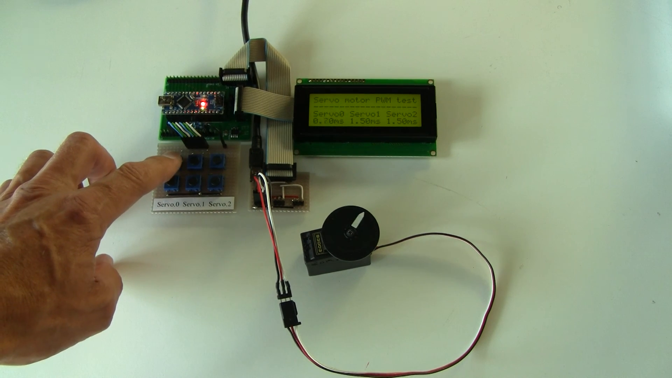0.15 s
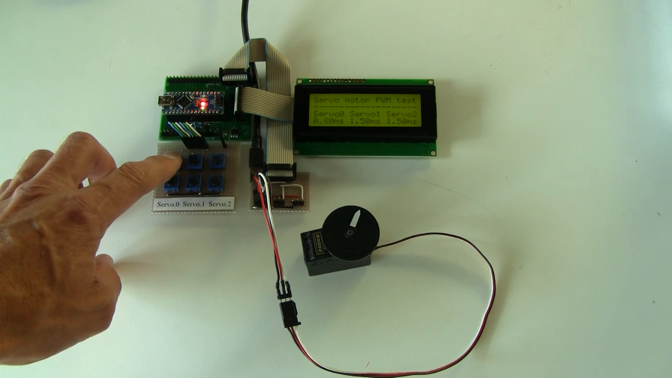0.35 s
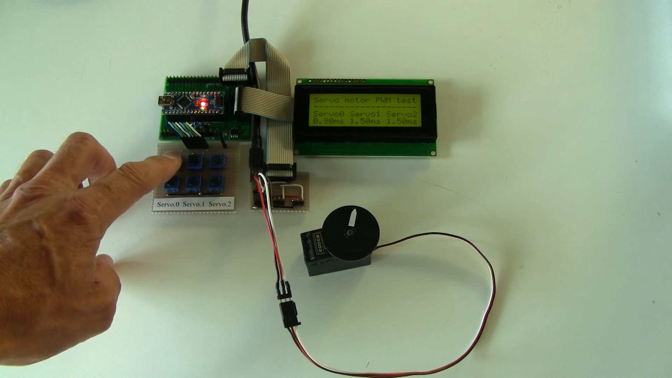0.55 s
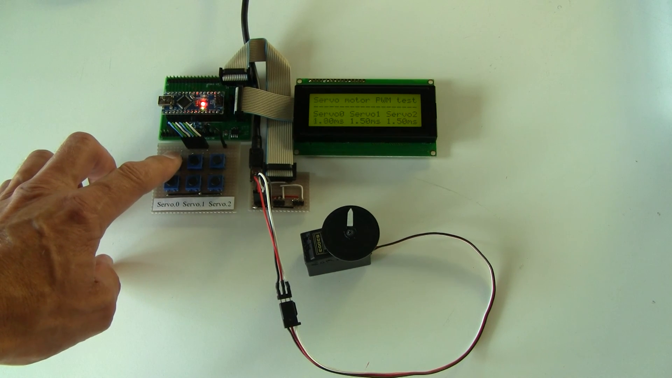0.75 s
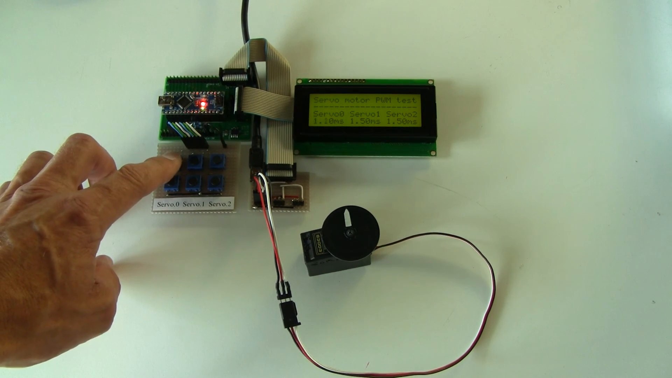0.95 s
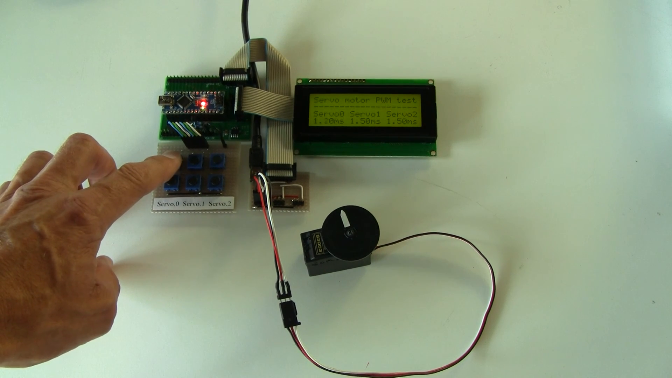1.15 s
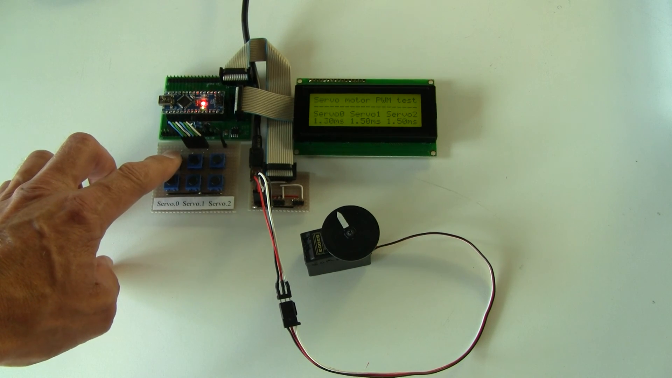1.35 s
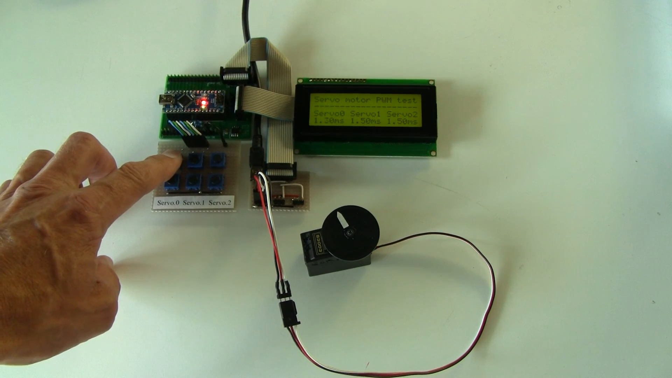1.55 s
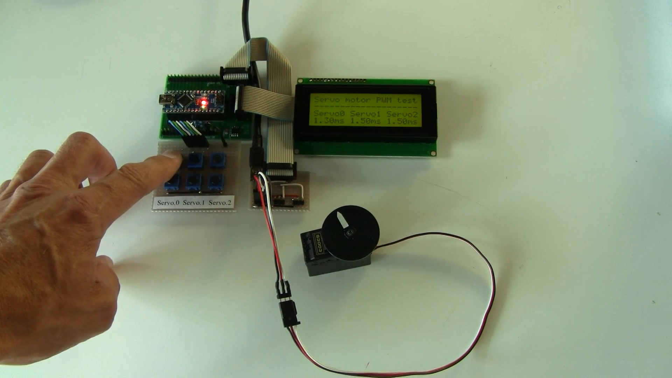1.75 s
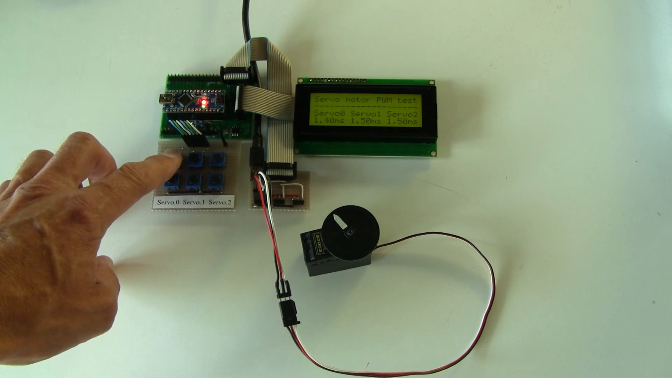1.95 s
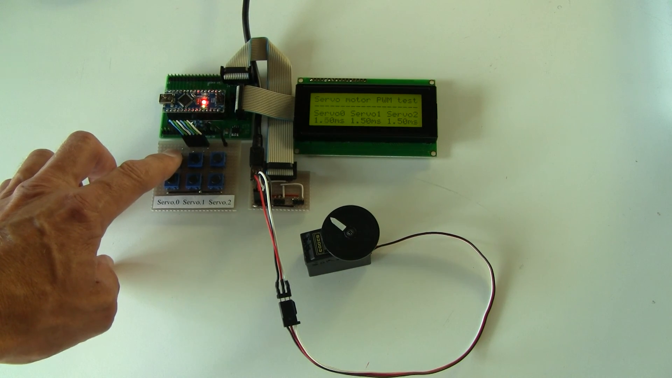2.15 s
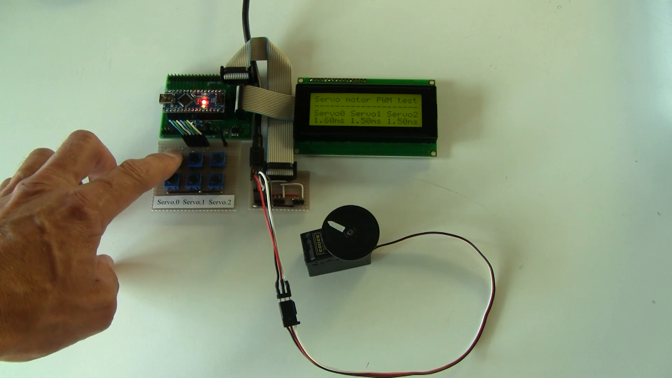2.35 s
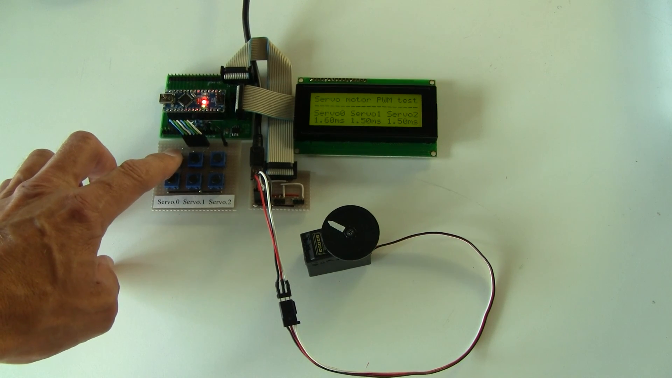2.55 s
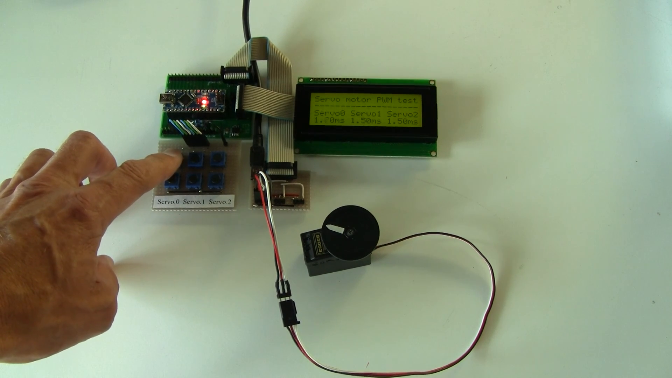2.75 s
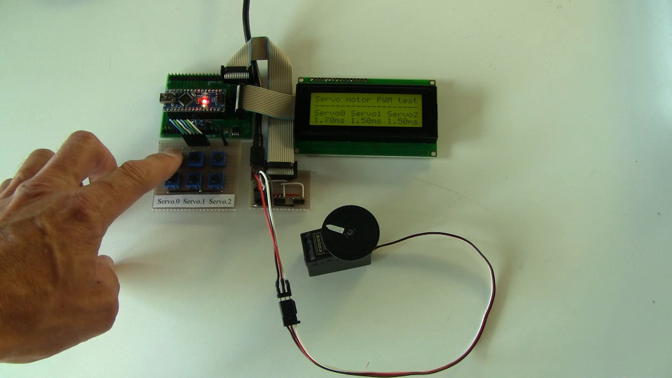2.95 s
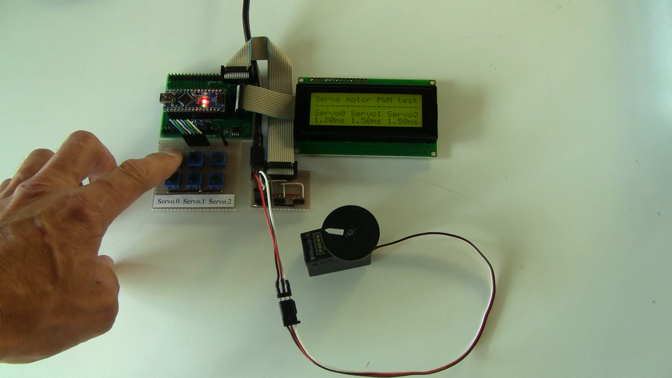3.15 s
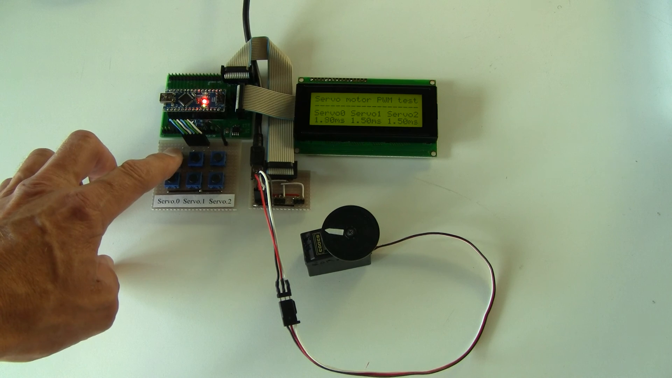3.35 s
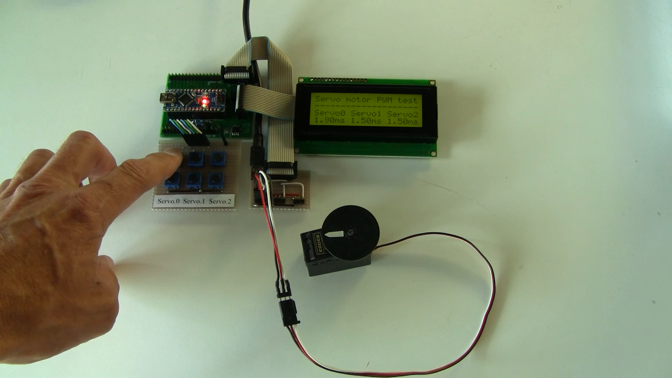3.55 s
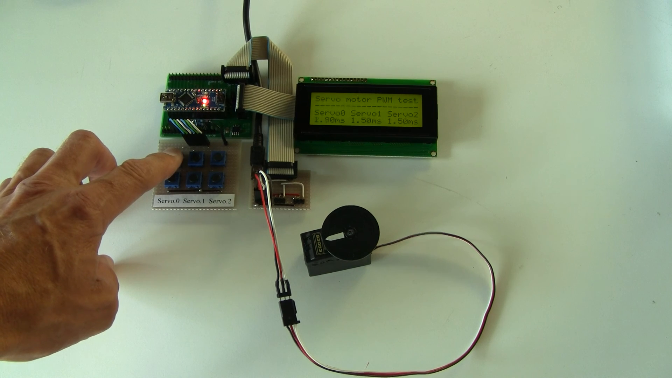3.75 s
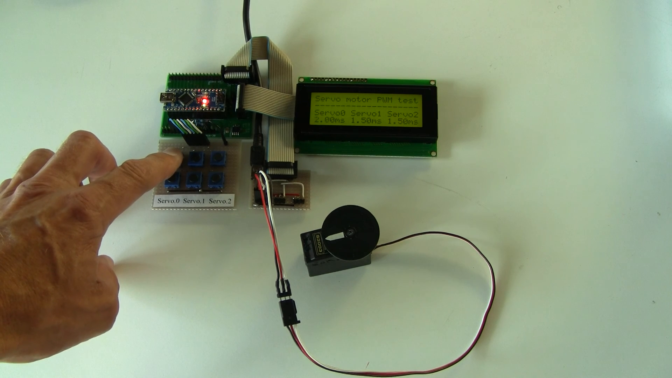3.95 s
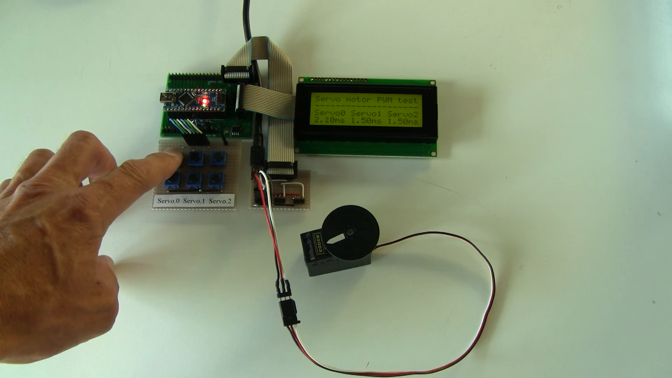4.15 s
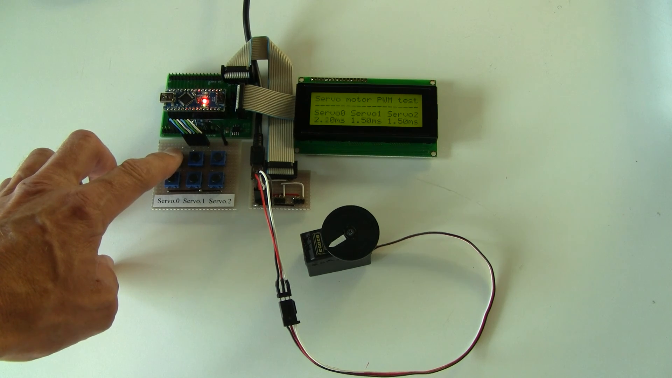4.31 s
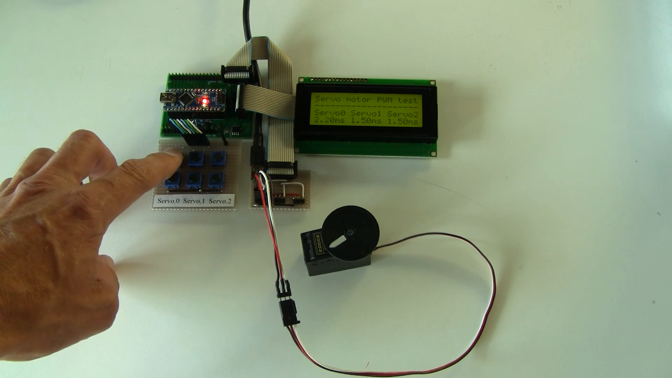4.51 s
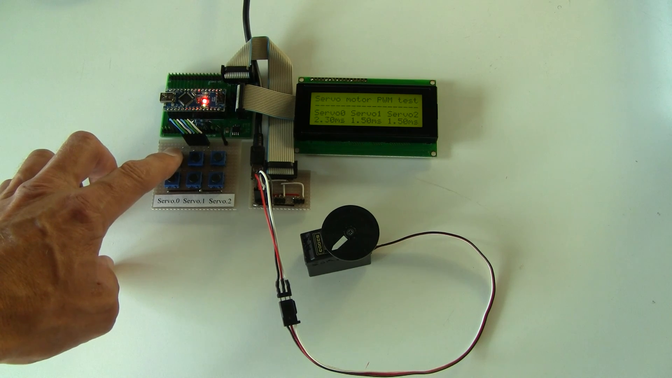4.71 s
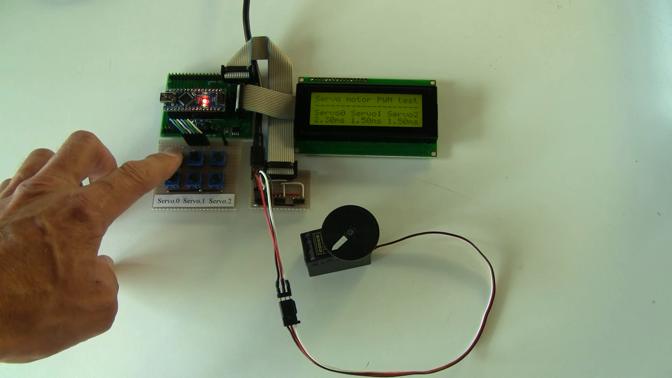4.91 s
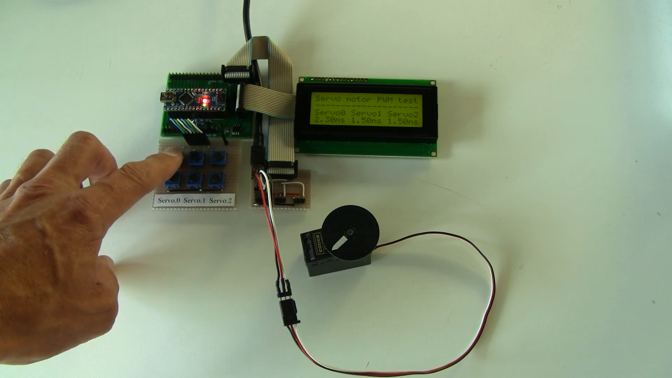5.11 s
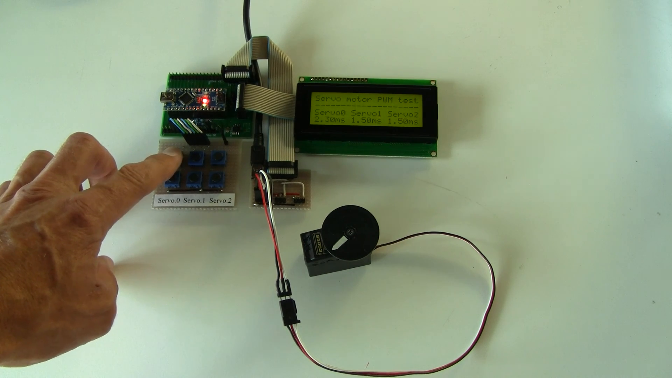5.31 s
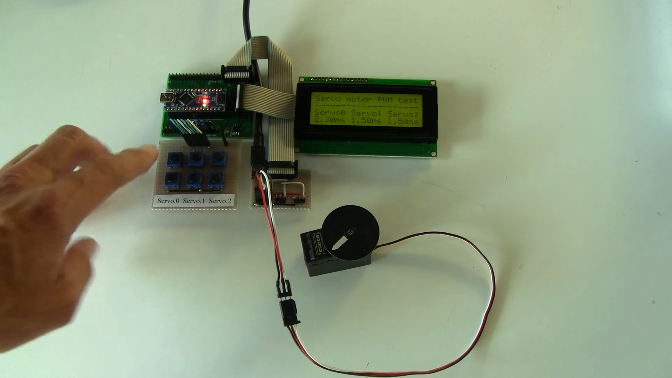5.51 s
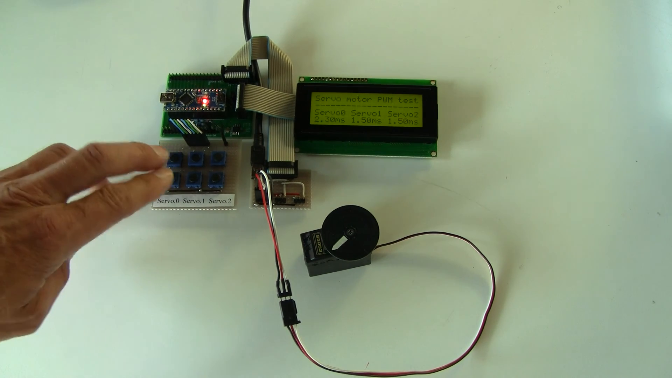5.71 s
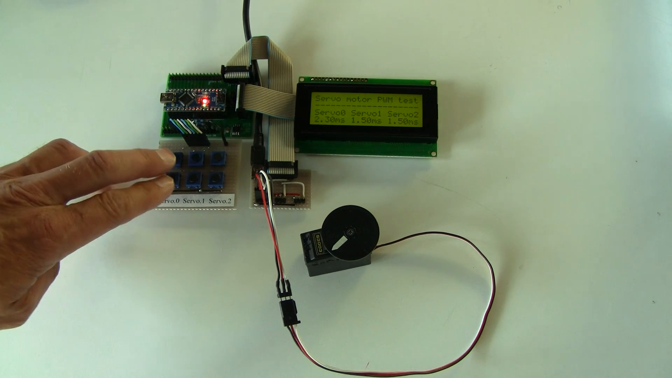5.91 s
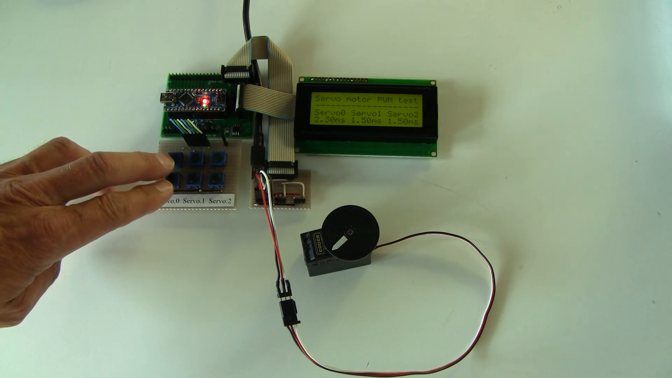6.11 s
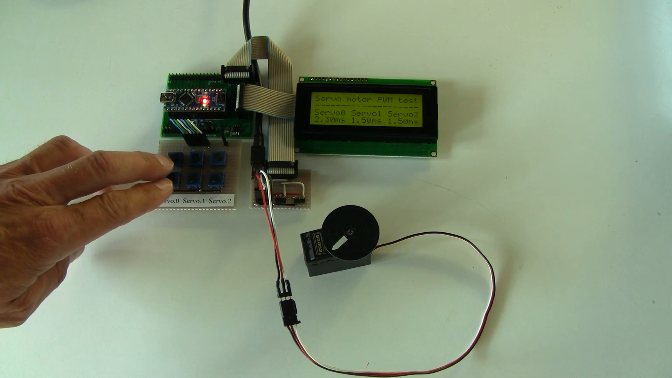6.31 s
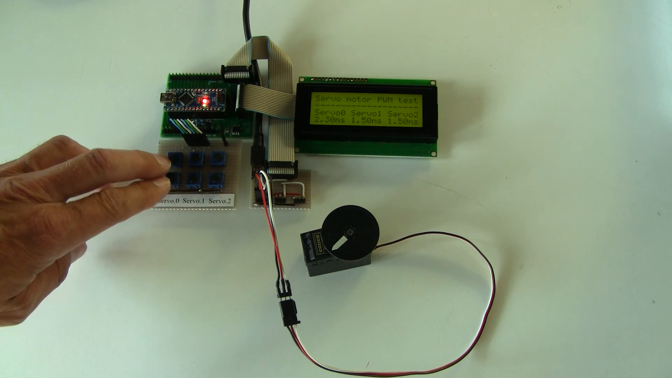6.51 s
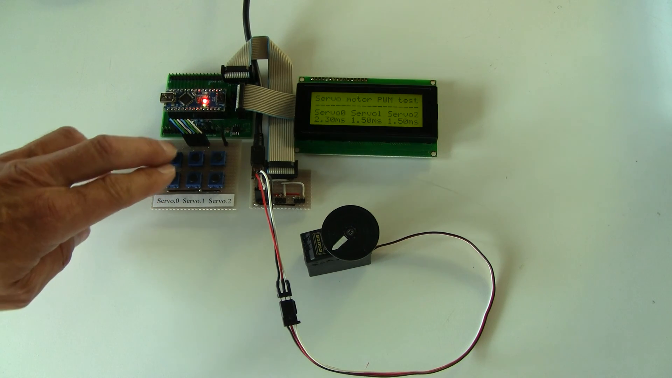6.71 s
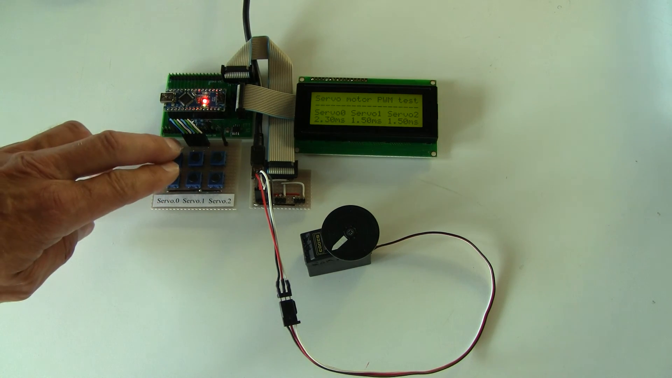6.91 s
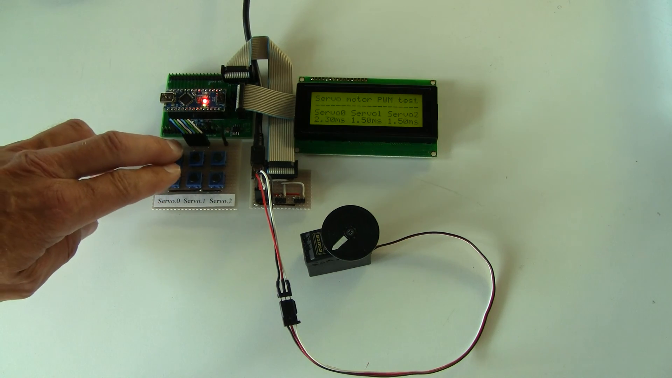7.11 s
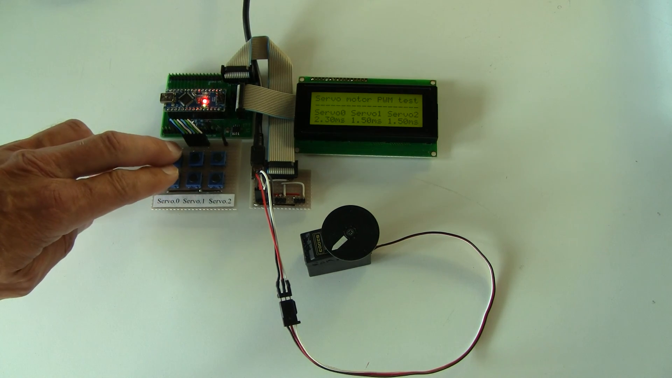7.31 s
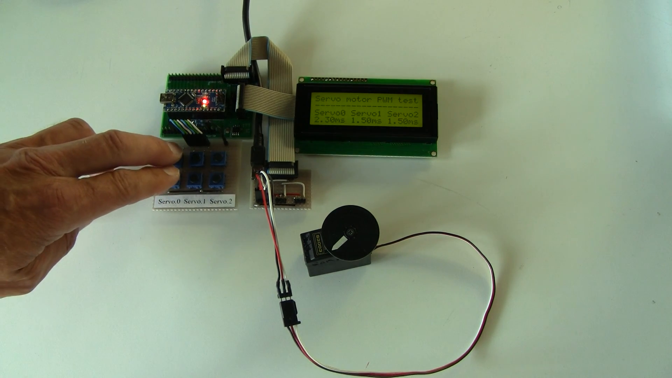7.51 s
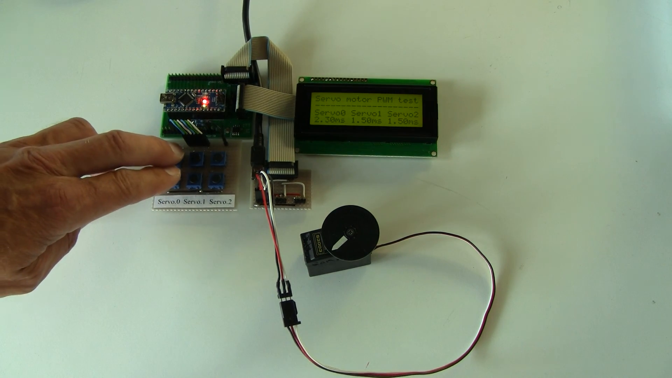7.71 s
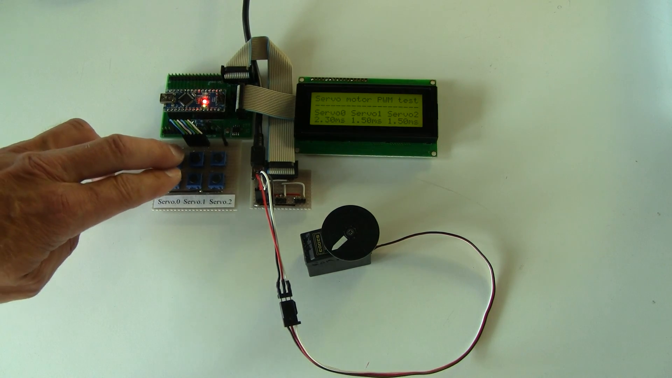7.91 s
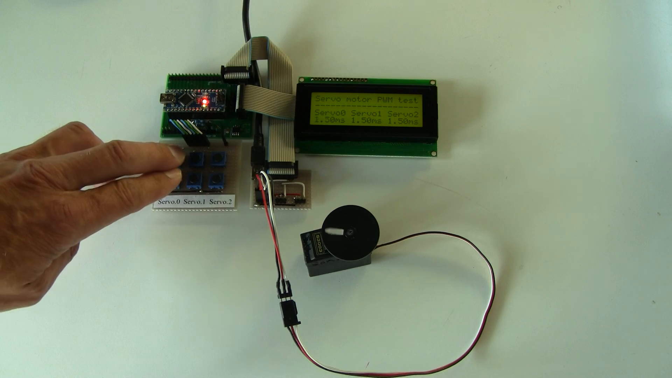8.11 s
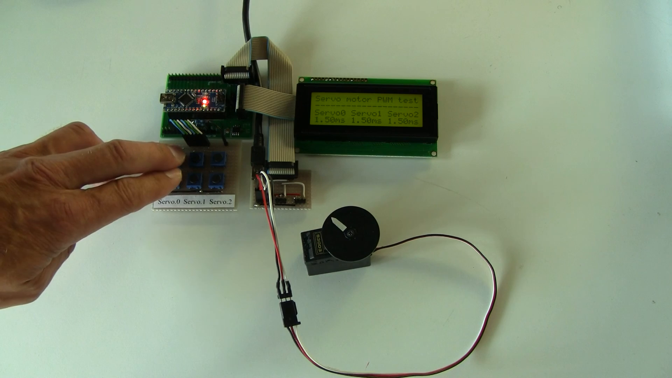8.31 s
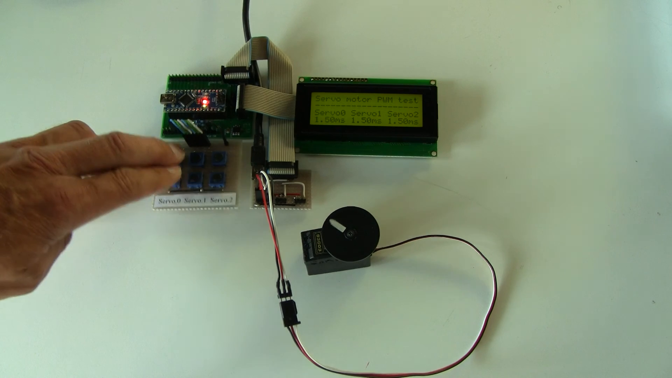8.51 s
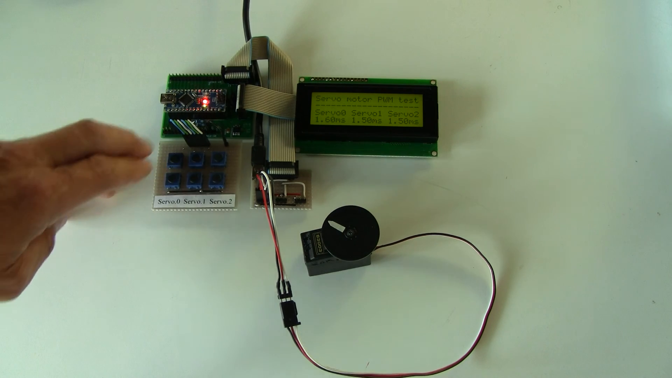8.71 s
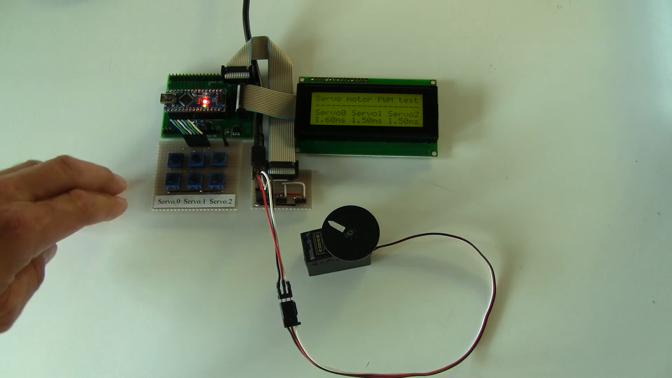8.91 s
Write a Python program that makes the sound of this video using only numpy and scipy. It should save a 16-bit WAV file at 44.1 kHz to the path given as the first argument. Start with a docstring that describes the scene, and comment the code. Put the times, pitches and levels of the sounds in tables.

```python
"""Sharp snaps come first: a finger works small dome buttons on a table top, each press and release ringing the
same modes. Soon after most presses a hobby servo jerks one step, as rubbing noise through its case; later it
makes one long sweep, where tooth contacts sing too. Further off in a small room something knocks on wood, struck
modes with noise, and a hand thuds low on the table. Under it all lie mains hum, a low ventilation rush and the
hiss of a stereo camera microphone, made of sines and shaped noise."""
import sys
import numpy as np
from scipy import signal
from scipy.fft import rfft, irfft, next_fast_len
from scipy.io import wavfile
from scipy.ndimage import uniform_filter1d, map_coordinates

SR = 44100
rng = np.random.default_rng(int(sys.argv[2]) if len(sys.argv) > 2 else 0)


def transcribe(signal):
    """Save signal, clipped to [-1, 1], as a 16-bit WAV file at the path in sys.argv[1]."""
    frames = np.atleast_2d(signal).T
    limited = np.clip(frames, -1, 1)
    pcm = np.round(limited * 32767).astype(np.int16)
    wavfile.write(sys.argv[1], SR, pcm)


def volts_from_db(level):
    """Convert decibel levels to linear amplitude ratios."""
    exponent = np.asarray(level, float) / 20
    return 10 ** exponent


N = 394694  # samples


def unit(x):
    """Scaled to rms 1."""
    return x / np.sqrt(np.mean(x ** 2) + 1e-20)


def along(points, hz):
    """Reads (Hz, value) points on a log frequency axis."""
    f, v = np.transpose(points)
    return np.interp(np.log(hz + 1), np.log(f + 1), v)


def curve(rows):
    """One value per sample from (seconds, value) rows."""
    return np.interp(np.arange(N) / SR, *np.transpose(rows))


def wobble(rate):
    """A smooth random curve with rate knots a second."""
    knots = rng.standard_normal(int(N * rate / SR) + 4)
    return map_coordinates(knots, [np.arange(N) * rate / SR])


def filtered(x, response):
    """Multiplies the spectrum of x by a complex response of frequency."""
    m = next_fast_len(x.shape[-1] + 8192)
    spectrum = rfft(x, m) * response(np.fft.rfftfreq(m, 1 / SR))
    return irfft(spectrum, m)[..., :x.shape[-1]]


def add(track, sound, s):
    """Mixes a sound into the track at s seconds."""
    part = track[..., round(s * SR):][..., :sound.shape[-1]]
    part += sound[..., :part.shape[-1]]


# Ventilation rush and hiss at the microphone. Each row: frequency in Hz, relative density in dB per Hz.
AIR_SPECTRUM = [(15, -56), (25, -23), (92, -10), (123, -10.5), (145, -8), (206, -7.5), (270, -9),
                (301, -6.5), (363, -12.5), (575, -11.5), (624, -12.5), (840, -15), (962, -18.5),
                (1190, -20.5), (16000, -49.5)]
# How the low rush swells. Each row: time in seconds, gain in dB.
RUSH_GAIN = [(0, -48.5), (.74, -44.5), (1.72, -48.5), (2.14, -46.5), (7.3, -49), (8.95, -46)]
# How alike the two microphones hear the air. Each row: frequency in Hz, left-right correlation (-1 to 1).
LIKENESS = [(60, 0.83), (130, 0.92), (290, -0.019), (640, -0.36), (1410, -0.03), (3100, 0.04), (6820, 0.22),
            (15000, -0.097)]
# Mains lines. Each row: frequency in Hz, mean level in dB rms midway between the two sides.
MAINS_LINES = [(100, -63), (120, -55), (200, -61), (300, -66)]
# Presence lift of the microphone on the hiss. Each row: frequency in Hz, gain in dB.
HISS_LIFT = [(2500, 0.5), (6000, 3), (10000, 5.5), (15000, 9)]


def air():
    """Room rush and microphone hiss, alike on both sides only in the bass, with wavering mains lines."""
    # splitting noise into mid and side by this angle gives the wanted correlation
    angle = lambda hz: np.arccos(np.clip(along(LIKENESS, hz), -1, 1)) / 2
    split = lambda hz: volts_from_db(along(AIR_SPECTRUM, hz)) * [np.cos(angle(hz)), np.sin(angle(hz))]
    mid, side = filtered(rng.standard_normal((2, N)), split)
    rush = unit(np.array([mid + side, mid - side]))
    low = filtered(rush, lambda hz: 1 / (1 + (hz / 900) ** 2))  # only the rush swells, the hiss stays
    hiss = volts_from_db(-49.0) * filtered(rush - low, lambda hz: volts_from_db(along(HISS_LIFT, hz)))
    t = np.arange(N) / SR
    hum = 0
    for hz, db in MAINS_LINES:
        strength = np.sqrt(2) * volts_from_db(db + 1.5 * wobble(6))
        hum = hum + strength * np.sin(2 * np.pi * hz * t + .4 * wobble(4))
    hum = hum * volts_from_db([[-.5], [.5]])  # a little stronger on the right
    return volts_from_db(curve(RUSH_GAIN)) * low + hiss + hum


# Decay of the small room. Each row: frequency in Hz, t60 in seconds.
ROOM_DECAY = [(300, 0.19), (1500, 0.45), (4000, 0.4), (7000, 0.32), (13000, 0.28)]
# Tone of the room's answer. Each row: frequency in Hz, relative gain in dB.
ROOM_TONE = [(500, 6.5), (1500, -1), (3800, -4), (5500, -2.5), (7000, 4.5), (8300, -6), (10000, -10.5),
             (15000, -4.5)]


def room(x):
    """Each frequency of the room's answer dies at its own speed; the two sides differ."""
    hz, t, z = signal.stft(rng.standard_normal((2, SR // 2)), SR, nperseg=256)
    decay_db = along(ROOM_TONE, hz)[:, None] - 60 * t / along(ROOM_DECAY, hz)[:, None]
    tail = signal.istft(z * volts_from_db(decay_db), SR, nperseg=256)[1]
    tail = tail * np.clip(np.arange(tail.shape[1]) / (.009 * SR), 0, 1)  # the walls answer late
    return signal.fftconvolve(np.atleast_2d(x), tail / np.linalg.norm(tail[0]), axes=1)


# Dome collapses under the finger. Each row: start in seconds, gain in dB.
PRESS_SNAPS = [(0.0085, -12.5), (0.2145, -12.5), (0.4192, -13.0), (0.6219, -13), (0.8319, -12),
               (1.0406, -12.5), (1.2961, -13), (1.8308, -13.5), (2.0452, -12.5), (2.3028, -13),
               (2.6957, -13.5), (3.0347, -12.5), (3.4023, -12.5), (3.7351, -12.5), (4.0395, -13.0),
               (4.2875, -13.5), (4.5383, -13), (4.8126, -13), (7.9713, -12.5), (8.0343, -13.5)]
# Domes springing back. Each row: start in seconds, gain in dB.
RELEASE_SNAPS = [(0.1047, -6), (0.3104, -6), (0.5146, -5.1), (0.7168, -5.5), (0.9131, -6), (1.1424, -6),
                 (1.3967, -5.5), (1.9243, -6), (2.1844, -5), (2.4373, -5.5), (2.8176, -5.5), (3.167, -6),
                 (3.5392, -5.5), (3.8794, -5), (4.167, -5), (4.4005, -5.5), (4.6778, -5.5), (4.9916, -5.5),
                 (8.518, -5.5), (8.5341, -6.5)]
# Modes of button and board. Each row: frequency in Hz, left and right relative level in dB, t60 in seconds.
BUTTON_MODES = [(676, -27.5, -30, 0.052), (880, -24, -24, 0.029), (1225, -33, -36, 0.16),
                (1392, -20.5, -20, 0.015), (2114, -27.5, -28, 0.066), (2803, -10.5, -13, 0.0066),
                (5370, -51.5, -40, 0.0053), (5400, -27.5, -33, 0.0072), (6106, -19, -9, 0.0055),
                (6520, -35, -22.5, 0.018), (7255, -3, -16, 0.018), (8337, -2.5, -9.5, 0.0027),
                (9180, -1.5, 3.5, 0.0012), (11010, -6.5, -4, 0.0016), (12140, -9, -37, 0.016),
                (14100, -30, -19, 0.0037), (15800, -21, -32, 0.0056)]
# Loose parts of the board. Each row: frequency in Hz, relative gain in dB.
BOARD_RATTLE = [(300, -14), (1200, -1.5), (3000, -9.5), (6500, 3), (12000, -3), (16000, -4.5)]
PRESS_TILT_DB, RELEASE_TILT_DB = 0.73, 3  # treble lift per octave


def buttons():
    """Every snap rings the same modes in step, a press with the opposite sign; the table top repeats it at once."""
    out, t = np.zeros((2, N)), np.arange(SR // 16) / SR
    hz, left_db, right_db, t60 = np.transpose(BUTTON_MODES)[..., None]
    echo = lambda f: 1 + .8 * np.exp(-2j * np.pi * f * .000205)  # off the table top
    less_bass = lambda f: 1j * f / (1j * f + 1500)
    for table, sign, tilt_db in (PRESS_SNAPS, -1, PRESS_TILT_DB), (RELEASE_SNAPS, 1, RELEASE_TILT_DB):
        for s, db in table:
            scatter_db = rng.standard_normal(hz.shape) + tilt_db * np.log2(hz / 7000)
            onset = 1 - np.exp(-t / .00008)
            modes = volts_from_db(scatter_db - 60 * t / t60) * np.sin(2 * np.pi * hz * t) * onset
            ring = np.array([(volts_from_db(left_db) * modes).sum(0), (volts_from_db(right_db) * modes).sum(0)])
            ring = filtered(ring, lambda f: echo(f) * less_bass(f))
            noise = rng.standard_normal((2, len(t)))  # differs each time
            rattle = filtered(noise, lambda f: volts_from_db(along(BOARD_RATTLE, f)))
            snap = sign * volts_from_db(db) * (ring + volts_from_db(-18.5 - 60 * t / 0.042) * rattle)
            add(out, snap, s)
            crack = snap.mean(0) * volts_from_db(-60 * t / 0.00078)  # the walls hear mostly the first crack
            add(out, volts_from_db(-7) * room(crack), s)
    return out


SPIN_UP_S, START_DB, STOP_DB_PER_S = 0.011, -11, 1113  # the rasp starts below its level, swells, holds, stops


def run_db(s, length, db):
    """Level in dB of one run (swell, hold, quick stop), and the seconds since its start."""
    u = np.arange(N) / SR - s
    spin_up_db = START_DB * np.clip(1 - u / SPIN_UP_S, 0, 1)
    outside_s = np.clip(u - length, 0, 1) + np.clip(-u, 0, 1)
    return np.maximum(db + spin_up_db - STOP_DB_PER_S * outside_s, -120), u


def patchy(x, depth_db):
    """The colour drifts at random from moment to moment."""
    z = signal.stft(x, nperseg=256)[2]
    field = uniform_filter1d(rng.standard_normal(z.shape[1:]), size=5, axis=0)
    field = uniform_filter1d(field, size=8, axis=1)
    return signal.istft(z * volts_from_db(depth_db * unit(field)), nperseg=256)[1][:, :N]


# Resonances of the servo case. Each row: frequency in Hz, width in Hz, relative level in dB during a step,
# relative level in dB at full speed.
CASE_MODES = [(1170, 470, -18, -15.5), (1970, 155, -12, -9.5), (2635, 640, -14, -19), (3550, 400, -12, -16),
              (4600, 650, -12, -12), (5980, 235, 1.5, -5), (6600, 450, -6, -8.5), (7490, 790, -7.5, -7.5),
              (8640, 480, -11, -12.5), (9700, 460, -10.5, -13), (10850, 830, -11.5, -11.5),
              (11920, 400, -4.5, -3.5), (12670, 1300, -14, -16), (15100, 1500, -17.5, -13)]
# Servo at the left microphone over the right. Each row: frequency in Hz, difference in dB.
LEFT_OVER_RIGHT = [(300, 4), (1500, 0), (5000, -1), (9000, -1.5), (13000, 4.5)]


def gears(teeth, speed, rough_db):
    """Tooth contacts within lumpy rubbing noise, through the case resonances (speed: 0 in a step, 1 full)."""
    rub = volts_from_db(rough_db * wobble(500)) * rng.standard_normal((2, N))
    drive = teeth + unit(rub[0])
    pair = np.array([drive + 0.47 * unit(rub[1]), drive - 0.067 * unit(rub[1])])

    def case(f):
        """Sum of band resonances with alternating sign."""
        total = 0
        for k, (c, w, *db) in enumerate(CASE_MODES):
            total = total + (-1) ** k * volts_from_db(db[speed]) * 1j * f * w / (c * c - f * f + 1j * f * w)
        return total

    sides = lambda f: volts_from_db(np.outer([.5, -.5], along(LEFT_OVER_RIGHT, f)))
    return unit(filtered(patchy(pair, depth_db=1.2), lambda f: case(f) * sides(f)))


# Servo jerks, one soon after a press; the last row is a short bright rasp of noise after the final snaps.
# Each row: start in seconds, level in dB.
SHORT_RASPS = [(.030, -39.5), (0.229, -39.5), (.428, -39.5), (.648, -39), (0.849, -39.5), (1.066, -41.5),
               (1.311, -42), (1.854, -42), (2.069, -39.5), (2.332, -44), (2.712, -42.5), (3.05, -39.5),
               (3.427, -39.5), (3.751, -40.5), (4.068, -38.5), (4.309, -37.5), (4.568, -38), (8.541, -42)]
# The long sweep, one row: start in seconds, length in seconds, level in dB.
SERVO_SWEEP = (7.986, .32, -41.5)
# Tone of the tooth harmonics. Each row: frequency in Hz, relative gain in dB.
TOOTH_TONE = [(700, -20), (2200, -4), (4000, -16), (6000, -9), (10000, -10), (12500, -14), (15000, 1)]
RASP_S = 0.054  # a step lasts about three control frames
SAG_DB = 3  # the sweep fades a little as it nears its goal
TOOTH_START_HZ, TOOTH_TOP_HZ, SPEED_UP_S = 545, 740, .048  # tooth contacts close in on full speed


def servo():
    """Short steps never reach speed and only rasp; the sweep spins up until the tooth rate sings."""
    effort = sum(volts_from_db(run_db(s, RASP_S, db)[0]) for s, db in SHORT_RASPS)
    rasps = effort * volts_from_db(0.5 * wobble(100)) * gears(0, 0, rough_db=1.6)
    sweep_db, u = run_db(*SERVO_SWEEP)
    speed_gap = np.exp(-np.clip(u, 0, 1) / SPEED_UP_S)
    tooth_hz = TOOTH_TOP_HZ - (TOOTH_TOP_HZ - TOOTH_START_HZ) * speed_gap
    turns = np.cumsum(tooth_hz * (1 + .0003 * wobble(40))) / SR  # counted in tooth contacts
    teeth = unit(sum(volts_from_db(4 * wobble(12)) * np.cos(2 * np.pi * k * turns) for k in range(1, 22)))
    teeth = .9 * filtered(teeth, lambda f: volts_from_db(along(TOOTH_TONE, f)))
    sag_db = SAG_DB * np.clip(u / SERVO_SWEEP[1], 0, 1) ** 4
    sweep = volts_from_db(sweep_db - sag_db + 1.3 * wobble(88)) * gears(teeth, 1, rough_db=-1.0)
    direct = rasps + sweep
    return direct + volts_from_db(-16) * room(direct.mean(0))[:, :N]


# Knocks on wood, further off. Each row: start in seconds, gain in dB, snap level in dB, t60 in seconds,
# where it rings most in Hz.
BLOWS = [(5.406, -28.5, -31, 0.13, 790), (5.449, -18, -6.5, 0.19, 1095), (5.963, -50.5, 20, 0.028, 2500),
         (7.226, -26, -31, 0.13, 830), (7.245, -30, -7, 0.049, 1230), (7.406, -44, -26, 0.054, 1070),
         (7.523, -44.5, -34, 0.069, 1470), (7.757, -39.5, -10, 0.11, 1800), (8.563, -16, -22, 0.12, 790),
         (8.598, -13, -16, 0.054, 800), (8.619, -18.5, 0, 0.16, 1430), (8.635, -16.5, -7, 0.1, 850),
         (8.660, -25.5, -5.5, 0.19, 1040)]
# Modes of the wood. Each row: frequency in Hz, mean relative level in dB, longest t60 in seconds.
WOOD_MODES = [(610, -2, 0.1), (679.5, -7.5, 0.23), (806, -8, 0.023), (906, -9.5, 0.08), (999, -18, 0.33),
              (1236, -6, 0.064), (1427, -6, 0.069), (1660, -12, 0.093), (1800, -11, 0.14),
              (1960, -16, 0.073), (2500, -13, 0.055), (3090, -28, 0.038), (4600, -22, .03)]
# Dull rattle under each knock. Each row: frequency in Hz, relative density in dB per Hz.
RATTLE_TONE = [(350, -43), (560, 13.5), (1000, -8.5), (1700, -4.5), (2400, -2), (3200, -11), (4200, -16),
               (6000, -45)]
# Short snap of each knock. Each row: frequency in Hz, relative density in dB per Hz.
SNAP_TONE = [(1500, -27), (2500, 3), (5000, -9.5), (9000, -12), (15000, -26.5)]


def knocks():
    """Each blow rings the wood at new strengths under a dull dying rattle and a shorter snap."""
    out, t = np.zeros((2, N)), np.arange(SR // 3) / SR
    hz, level_db, life = np.transpose(WOOD_MODES)[..., None]
    swell = 1 - np.exp(-t / .0012)  # soft contact
    for s, db, treble_db, t60, centre_hz in BLOWS:
        # each spot favours its own pitch
        spot = lambda f: 1 / (1 + (1.8 * np.log2((f + 1) / centre_hz)) ** 2)
        draw = rng.standard_normal((2, len(WOOD_MODES), 1))
        mode_db = level_db + 1.35 * draw[0] - 60 * t / np.minimum(life, 0.98 * t60)
        modes = spot(hz) * volts_from_db(mode_db) * np.sin(2 * np.pi * hz * t + 3 * draw[1])
        ring = modes.sum(0)
        noise = rng.standard_normal((2, len(t)))
        body = unit(filtered(noise[0], lambda f: spot(f) * volts_from_db(along(RATTLE_TONE, f))))
        body = body * volts_from_db(-1.5 - 60 * t / t60)
        snap = unit(filtered(noise[1], lambda f: volts_from_db(along(SNAP_TONE, f))))
        snap = snap * volts_from_db(treble_db - 60 * t / (0.16 * t60))
        blow = volts_from_db(db) * (1.2 * ring + .6 * body + snap) * swell
        # small wooden parts radiate no bass
        blow = filtered(blow, lambda f: (1j * f / (1j * f + 450)) ** 3)
        add(out, np.array([blow, blow]), s)
        add(out, volts_from_db(-11.5) * room(blow), s)
    return out


def thud():
    """A hand lands on the table as it pulls away: one low dull push, a dying 290 Hz sine."""
    out, t = np.zeros(N), np.arange(SR // 4) / SR
    onset = 1 - np.exp(-t / 0.0013)
    push = volts_from_db(-31.0 - 60 * t / 0.1) * np.sin(2 * np.pi * 290 * t) * onset
    add(out, push, 8.6)
    return out


def scene():
    """All sources at the microphone pair."""
    return air() + buttons() + servo() + knocks() + thud()


def low_pass(x):
    """Removes everything above the highest recorded frequency."""
    return signal.sosfilt(signal.butter(12, 17040, fs=SR, output="sos"), x)


TOP_HZ = 15800  # upper band limit of the camera


def record(dry):
    """The microphone drops the deep bass and the camera keeps nothing above its band limit."""
    low_cut = lambda hz: (1j * hz / (1j * hz + 60)) ** 2
    mic = filtered(dry, lambda hz: low_cut(hz) / (1 + (hz / TOP_HZ) ** 200))
    return low_pass(mic)


dry = scene()
out = record(dry)
transcribe(out)
```